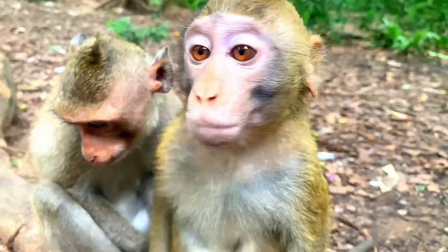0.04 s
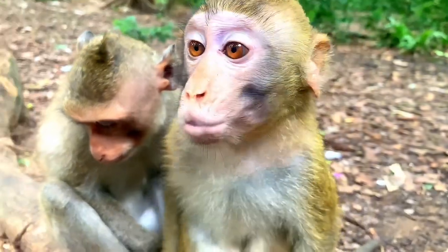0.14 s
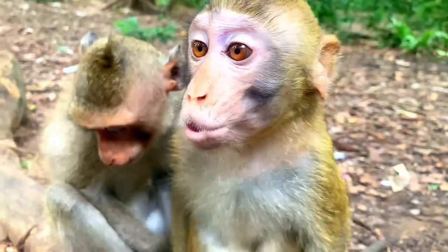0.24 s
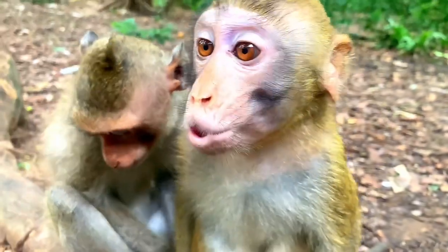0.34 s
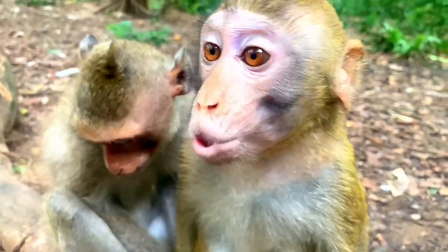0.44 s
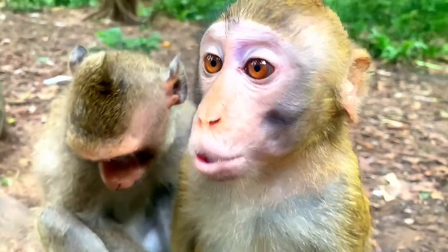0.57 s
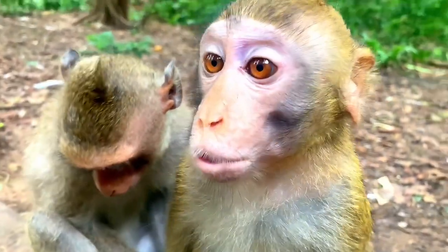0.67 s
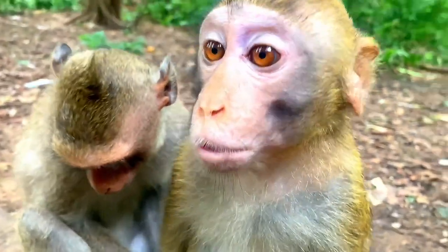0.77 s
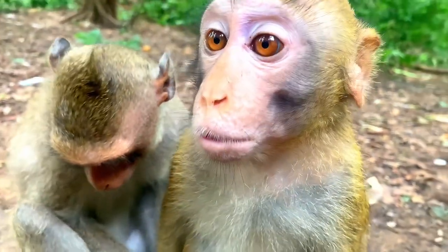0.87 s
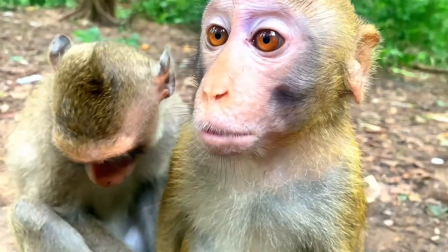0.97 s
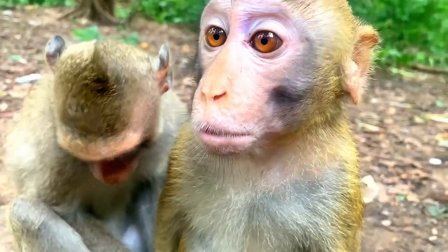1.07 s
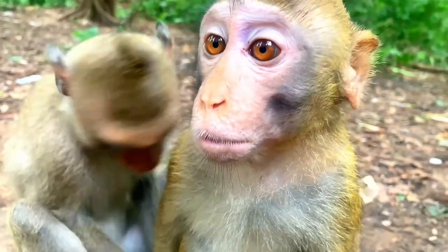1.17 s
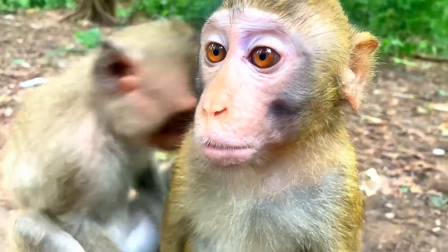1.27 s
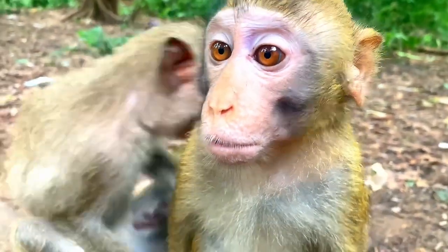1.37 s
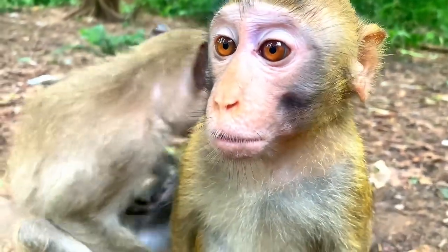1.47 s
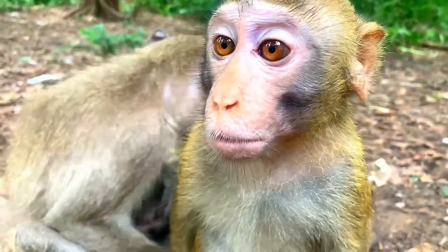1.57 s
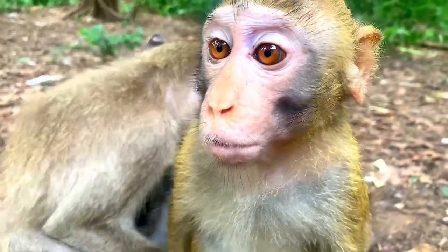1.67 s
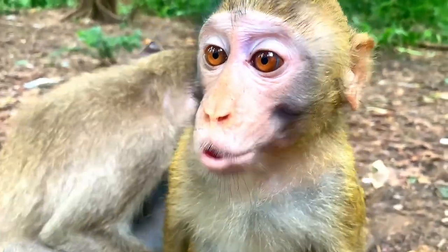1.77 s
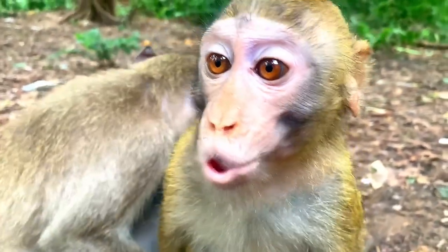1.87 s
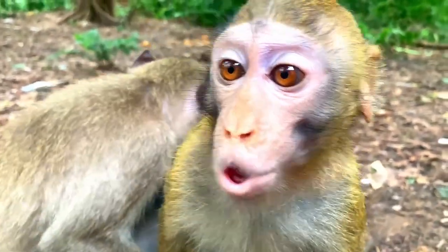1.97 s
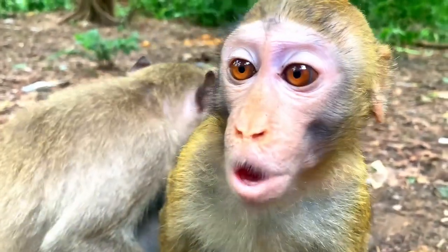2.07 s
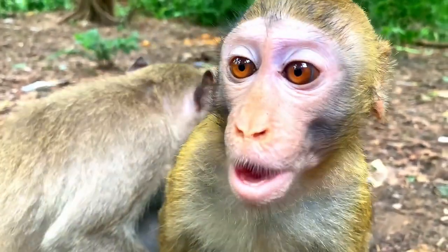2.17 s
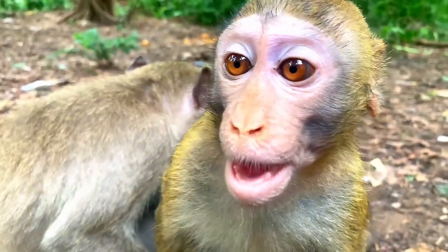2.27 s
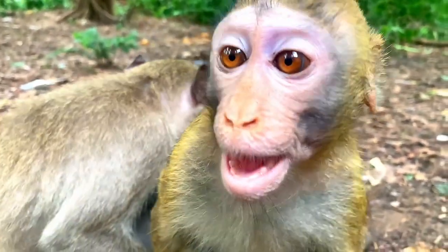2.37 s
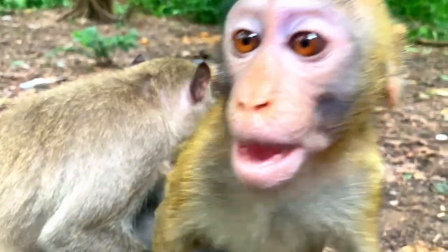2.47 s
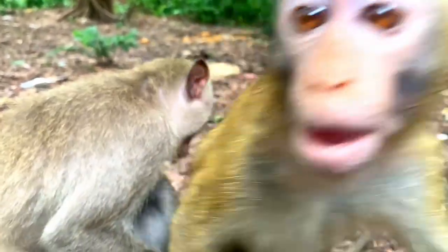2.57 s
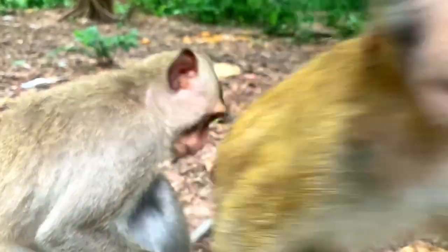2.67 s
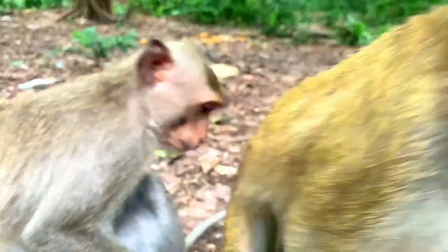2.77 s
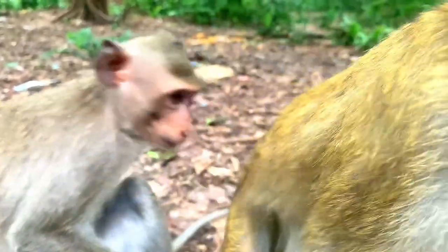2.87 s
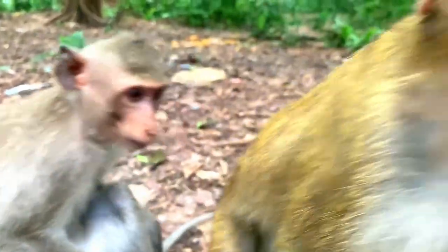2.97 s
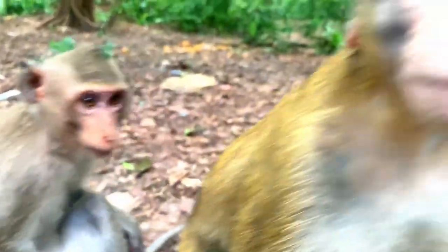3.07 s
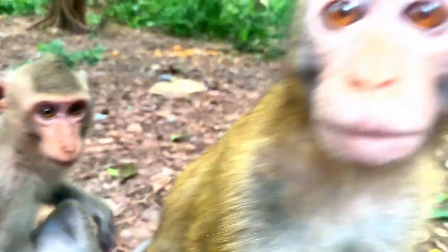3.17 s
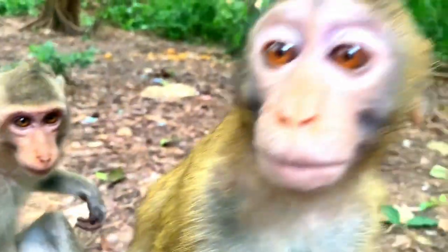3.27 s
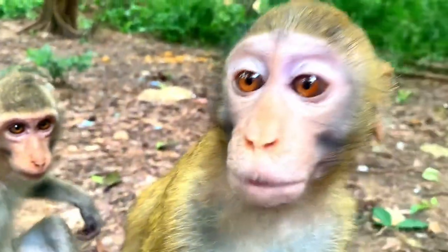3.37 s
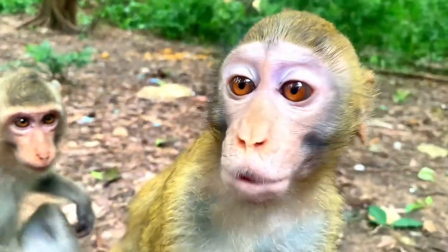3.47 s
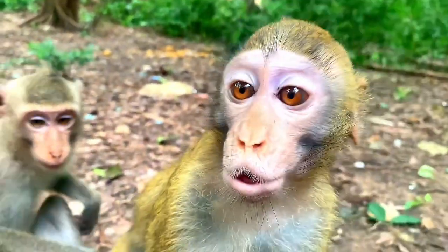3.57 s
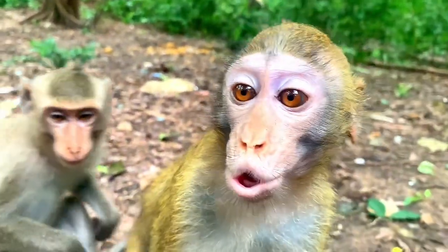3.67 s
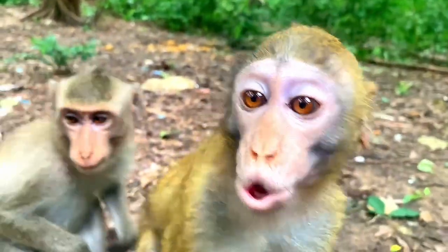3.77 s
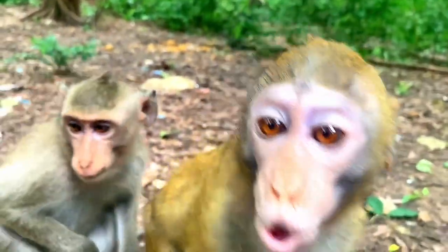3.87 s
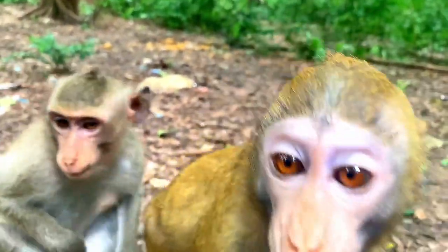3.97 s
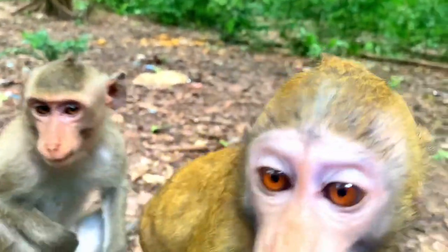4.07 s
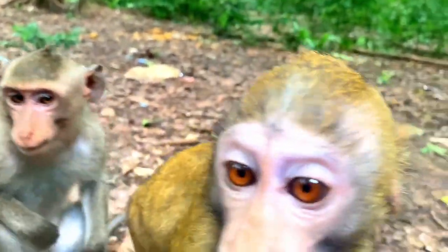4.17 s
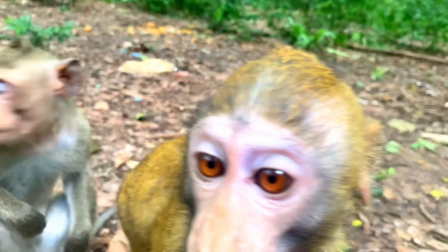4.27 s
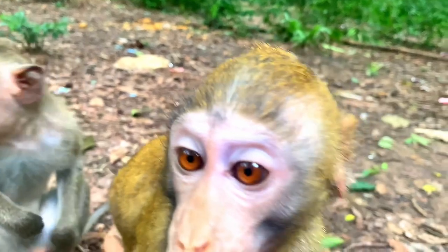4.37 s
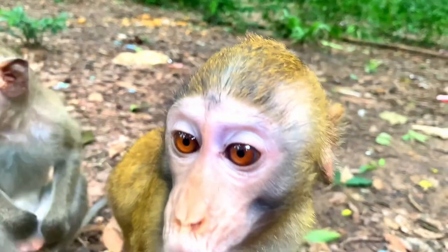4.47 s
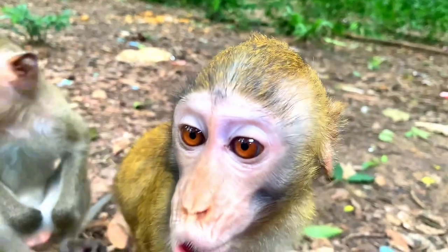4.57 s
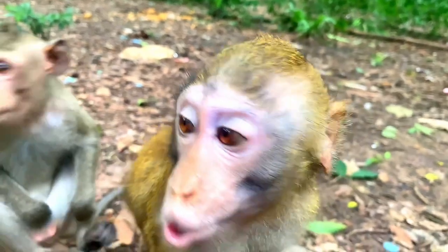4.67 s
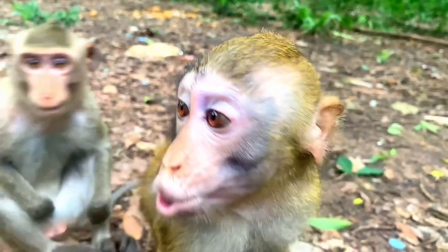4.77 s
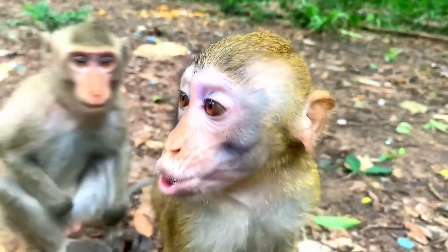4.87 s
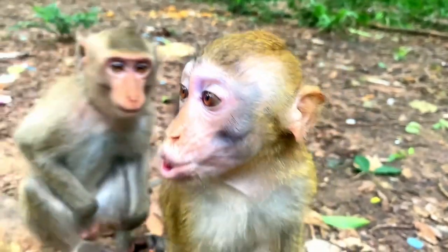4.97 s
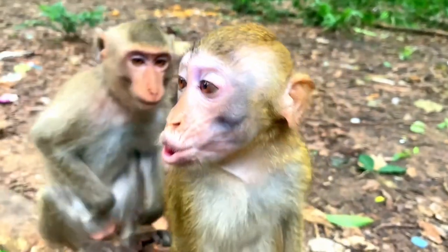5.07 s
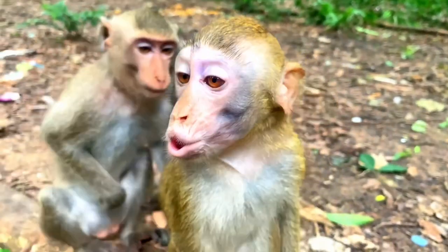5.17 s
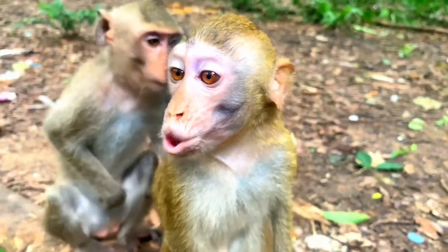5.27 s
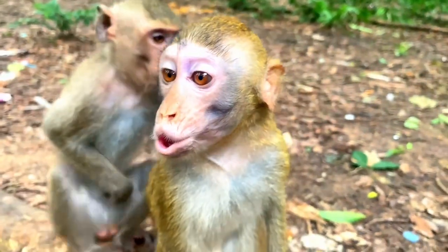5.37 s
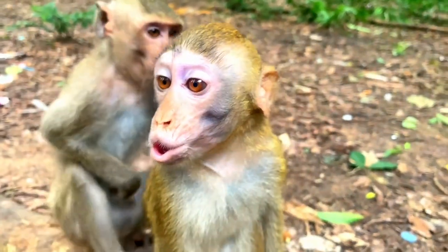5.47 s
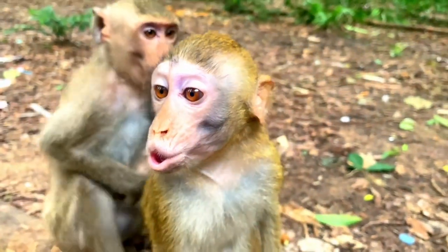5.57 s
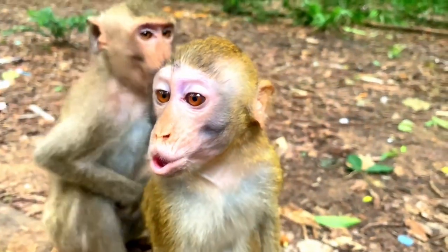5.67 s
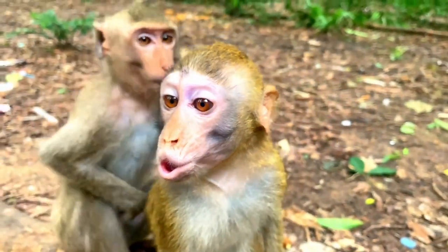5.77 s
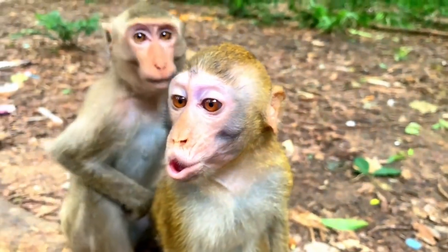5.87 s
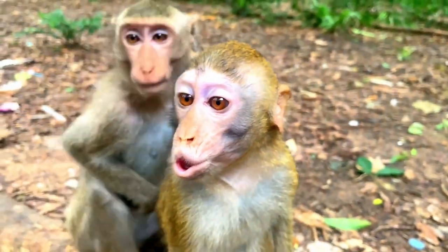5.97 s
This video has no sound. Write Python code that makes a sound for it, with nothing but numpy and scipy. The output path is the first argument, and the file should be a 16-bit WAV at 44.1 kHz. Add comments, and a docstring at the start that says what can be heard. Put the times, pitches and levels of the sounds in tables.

```python
"""Young macaque calling in a leafy clearing

Close to a phone it gives four clear coos, a faint one, and a squeal that sweeps up into a scream: harmonics
weighted by mouth and throat resonances, with noise for breath and rasp. Monkeys shuffle on dry litter and
bump the phone (filtered impulses, bursts of noise), over a faint low outdoor hum (coloured noise).
For stretches everything under 8 kHz sinks, leaving only the thin top of the voice."""
import sys
import numpy as np
from scipy import signal
from scipy.fft import rfft, irfft, next_fast_len
from scipy.io import wavfile
from scipy.ndimage import uniform_filter1d, map_coordinates

SR = 44100
rng = np.random.default_rng(int(sys.argv[2]) if len(sys.argv) > 2 else 0)


def put_to_file(sound):
    """Save the sound as 16-bit audio at rate SR, in the file named by the first command-line argument."""
    columns = np.atleast_2d(sound).T  # one column per channel
    safe = np.clip(columns, -1, 1)
    whole_steps = np.round(safe * 32767)
    wavfile.write(sys.argv[1], SR, whole_steps.astype(np.int16))


N = 265813
TIME_S = np.arange(N) / SR
FFT_SIZE = next_fast_len(N + SR // 4)
FREQ_HZ = np.arange(FFT_SIZE // 2 + 1) * SR / FFT_SIZE
LOG_FREQ = np.log(FREQ_HZ + 1)

# Outdoor hum spectrum. Each row: frequency in Hz, density in dB per Hz.
HUM_SPECTRUM = [(20, -26), (50, 0), (100, -4), (140, -8), (200, -20), (320, -29), (450, -28), (650, -23),
                (900, -29), (1300, -42), (1750, -35), (2300, -58), (8200, -61), (11000, -72)]
# Microphone hiss spectrum. Each row: frequency in Hz, density in dB per Hz.
HISS_SPECTRUM = [(30, 0), (150, 3), (300, -1), (650, -3), (1200, -10), (2400, -16), (4300, -15),
                 (5500, -19), (7000, -21), (12500, -22), (14500, -34)]
HUM_DB, HISS_DB = -53.5, -78
# Faint far chirps. Each row: centre in seconds, length in seconds, pitch in Hz, level in dB.
CHIRPS = [(2.225, .06, 1625, -69), (2.86, .07, 1735, -69)]
# Shuffles on the litter and bumps on the phone. Each row: start in seconds, thud in dB, scuff in dB.
BUMPS = [(.005, -37, -66), (.044, -50, -56), (1.226, -62, -43), (1.849, -64, -52), (3.015, -52, -47),
         (3.156, -29, -54), (3.26, -37, -72), (3.394, -29, -50), (3.745, -30, -60), (3.915, -32, -58),
         (4.825, -39, -60), (5.246, -62, -49)]
# Spectrum of a dull push. Each row: frequency in Hz, gain in dB.
THUD_SPECTRUM = [(20, -8), (50, 3), (90, 1), (160, -9), (300, -24), (600, -34), (1200, -60), (4000, -100)]
# Spectrum of scuffed leaves. Each row: frequency in Hz, gain in dB.
SCUFF_SPECTRUM = [(200, -22), (400, -12), (540, 0), (750, -6), (1100, -13), (1500, -24), (2100, -30),
                  (3000, -48), (8000, -68)]
# One hollow knock. Single row: centre in seconds, length in seconds, pitch in Hz, level in dB.
KNOCK = (3.396, .007, 545, -39)

# Upper throat resonances. Each row: frequency in Hz, gain in dB.
THROAT = [(4300, -24), (5200, -20), (5900, -6), (6500, 1), (6950, -2), (7450, -20), (8050, -4), (8500, 0),
          (8900, 0), (9400, -6), (9750, -11), (10400, -18), (12000, -28), (14000, -44)]
# Air rushing through the strained throat. Each row: frequency in Hz, gain in dB.
RASP = [(1000, -30), (1650, -3), (2200, -14), (3100, -4), (3700, -5), (4600, 0), (5600, -13), (7000, -25),
        (8700, -17), (11000, -34)]
# Puffs of air at the start or end of a call. Each row: centre in seconds, length in seconds, level in dB,
# share of the low resonances in dB.
PUFFS = [(.048, .007, -66, -6), (2.435, .025, -66, -1), (3.609, .006, -77, -20), (4.245, .05, -87, -26),
         (4.398, .005, -72, -6), (5.135, .06, -93, -18)]

# Coo contours; the second is the faint one. Each row: time in seconds, pitch in Hz, effort in dB.
COO_1 = [(0.045, 997, -34), (0.075, 940, -29), (0.192, 934, -26), (0.285, 1011, -35), (0.305, 1068, -32),
         (0.36, 1085, -30), (0.468, 1097, -31), (0.528, 1182, -25)]
COO_2 = [(3.402, 1077, -63), (3.414, 1097, -55), (3.46, 1149, -45), (3.52, 1095, -46), (3.6, 1134, -46)]
COO_3 = [(3.609, 1055, -27), (3.636, 1129, -32), (3.712, 1116, -24), (3.749, 1074, -21), (3.89, 1072, -17),
         (3.955, 1090, -18), (4.076, 1056, -15), (4.125, 1014, -15), (4.16, 968, -21), (4.176, 952, -37)]
COO_4 = [(4.397, 956, -37), (4.474, 1022, -20), (4.62, 1070, -22), (4.77, 1083, -21), (4.81, 1091, -23),
         (4.95, 1062, -23), (5.032, 1017, -25), (5.064, 955, -29), (5.082, 938, -32)]
COO_5 = [(5.247, 963, -26), (5.34, 981, -27), (5.41, 1003, -27), (5.44, 1002, -27), (5.582, 1068, -20),
         (5.73, 1087, -22), (5.776, 1124, -26), (5.86, 1143, -28), (5.97, 1157, -29), (6.02, 1106, -28)]
# Voicing, one row per coo. Each row: first mouth resonance in Hz, second in Hz, second harmonic re effort
# in dB, level of the third in dB, throat ring in dB, ring rise in seconds, pitch jitter as a share.
VOICING = [(1044, 2167, -27, -66, -75, .03, .003), (1115, 2049, -16, -66, -105, .02, .008),
           (1159, 1983, -14.5, -48, -71.5, .02, .0014), (1103, 1959, -14.5, -61, -72.5, .07, .0014),
           (1151, 2010, -17, -61, -75, .48, .0018)]
# Widths of the first, second and third mouth resonance, in Hz.
MOUTH_WIDTHS_HZ = (72, 258, 560)
THIRD_RESONANCE_HZ = 2950
OVERTONE_RELEASE_S = .035  # upper harmonics die before the call ends

# Squeal contour. Each row: time in seconds, pitch in Hz.
SQUEAL = [(1.845, 1634), (1.877, 1802), (1.921, 2281), (2.011, 3129), (2.019, 3474), (2.033, 4525),
          (2.047, 5486), (2.067, 6125), (2.089, 7304), (2.111, 8095), (2.133, 8779), (2.181, 9276),
          (2.251, 9056), (2.353, 8591), (2.391, 8040), (2.41, 6776)]
# Moments of strain. Each row: centre in seconds, length in seconds, added roughness 0-1, flutter depth 0-1,
# rasp in dB, change of effort in dB.
STRAIN = [(2.049, .033, .65, .3, -67, -9), (2.29, .09, .09, .19, -64, -1)]
# Response of the wide-open mouth to a partial. Each row: frequency in Hz, gain in dB.
OPEN_MOUTH = [(1650, -27), (1840, -31), (2020, -14), (2400, -28), (2800, -14), (3100, -14.5), (3400, -28),
              (4300, -53), (5400, -48), (6200, -42), (7500, -60), (8200, -37), (9300, -37), (10700, -47),
              (15000, -50)]
# Fixed gaps in frequency that the squeal passes through, each applied twice. Each row: centre in Hz, width in
# Hz, depth of one pass 0-1.
SQUEAL_GAPS = [(2170, 110, .45), (2370, 170, .6), (2880, 70, .55), (8230, 50, .4), (8730, 170, .95),
               (9100, 170, .95)]
SQUEAL_START_DB, SQUEAL_RISE_S, SQUEAL_SAG_DB_PER_S, SQUEAL_RELEASE_S = -25, .115, 10, .02

# Phase by which the left port leads the right. Each row: frequency in Hz, phase in radians.
PORT_PHASE = [(300, 0), (1100, -.85), (1900, -.6), (2500, -1.3), (3100, -2.7), (3700, -3.1), (4200, 0),
              (5300, 3.1), (6500, 6.1), (9000, 8.8)]
# Stretches in which lows and mids sink. Each row: start in seconds, end in seconds.
DIPS = [(.062, .757), (3.425, 3.707), (4.18, 4.796), (5.424, 5.586)]
# Depth of that sinking. Each row: frequency in Hz, gain in dB.
DIP_DEPTH = [(60, -27), (1100, -28), (2200, -21), (3200, -26), (4500, -18), (6500, -11), (7900, -10),
             (8050, 0)]
# Bright peak of the right microphone. Each row: frequency in Hz, gain in dB.
RIGHT_PEAK = [(7850, 0), (8020, 20), (9200, 20), (9700, 14), (10400, 8), (12500, 0)]
TOP_HZ = 15100


def undb(db):
    """Decibels to gain."""
    return np.exp(np.asarray(db) * (np.log(10) / 20))


def unit(x):
    """Scale to rms 1."""
    return x / np.sqrt(np.mean(x ** 2))


def curves(table, t):
    """Each column of a table after the first, interpolated linearly at the times t."""
    s, *columns = np.transpose(table)
    return [np.interp(t, s, column) for column in columns]


def at(points, hz=None):
    """Read a spectrum on a log-frequency axis, by default at every FFT bin."""
    f, value = np.transpose(points)
    log_hz = LOG_FREQ if hz is None else np.log(hz)
    return np.interp(log_hz, np.log(f), value)


def filtered(x, response):
    """Apply a frequency response."""
    return irfft(rfft(x, FFT_SIZE) * response, FFT_SIZE)[..., :N]


def noise(points, size=N):
    """Gaussian noise of a given colour, rms 1."""
    n = next_fast_len(size, True)
    hz = np.arange(n // 2 + 1) * SR / n + 1
    spectrum = rfft(rng.standard_normal(N), n) * undb(at(points, hz))
    return unit(irfft(spectrum, n)[:size])


def waver(rate_hz, t):
    """Smooth random motion at a given rate, spread near 1."""
    steps = 2 * rate_hz * (t - t[0])
    return map_coordinates(rng.standard_normal(8192), [steps], order=2, mode="wrap")


def during(start_s, end_s, t, edge_s=.004):
    """1 between two times, with soft edges."""
    return (1 + np.tanh(2 * np.minimum(t - start_s, end_s - t) / edge_s)) / 2


def swell(centre_s, length_s, t):
    """Gaussian rise and fall around one moment."""
    return np.exp(-2 * ((t - centre_s) / length_s) ** 2)


def around(start_s, end_s):
    """Sample times of an event, with a 10 ms margin."""
    return TIME_S[(TIME_S > start_s - .01) & (TIME_S < end_s + .01)]


def placed(x, t):
    """Put a short sound at its times."""
    out = np.zeros(N)
    out[np.round(t * SR).astype(int)] = x
    return out


def resonance(hz, centre_hz, width_hz):
    """Gain of a steep resonance: 1 at its centre, 1/2 at half a width away."""
    return 1 / (1 + (2 * (hz - centre_hz) / width_hz) ** 2)


def hum():
    """Low coloured noise whose level wavers slightly."""
    return noise(HUM_SPECTRUM) * undb(HUM_DB + 1.2 * waver(8, TIME_S))


def hiss():
    """Microphone noise, shared in the bass and separate in the treble."""
    side = filtered(noise(HISS_SPECTRUM), np.clip(FREQ_HZ / 2500, 0, 1) ** 2)
    return undb(HISS_DB) * (noise(HISS_SPECTRUM) + np.array([side, -side]))


def clearing(x, t60_s=.6, wet_db=-45):
    """Trunks and leaves scatter a faint decaying tail, different at each port."""
    t = TIME_S[:SR // 2]
    tail = rng.standard_normal((2, len(t))) * undb(-60 * t / t60_s) * (t > .008)
    tail /= np.sqrt(np.sum(tail ** 2, axis=1, keepdims=True))
    colour = undb(at([(1000, -8), (3000, -6), (8500, 14)]))  # Hz, dB
    return undb(wet_db) * filtered(x, rfft(tail, FFT_SIZE) * colour)


def chirps():
    """Far-off notes: single sines of unsteady pitch that swell and fade."""
    out = 0
    for centre_s, length_s, hz, db in CHIRPS:
        t = around(centre_s - 2 * length_s, centre_s + 2 * length_s)
        phase = 2 * np.pi * np.cumsum(hz * (1 + .012 * waver(60, t))) / SR
        out = out + placed(swell(centre_s, length_s, t) * undb(db) * np.sin(phase), t)
    return out


def bumps(scuff_decay_s=.008):
    """Each contact is one dull push (a filtered impulse) and a decaying scuff of leaves (noise)."""
    pushes, scuffs = np.zeros(N), np.zeros(N)
    decay = np.exp(-TIME_S[:SR // 4] / scuff_decay_s)
    for start_s, thud_db, scuff_db in BUMPS:
        start = max(int(start_s * SR), 0)
        pushes[start] += undb(thud_db)
        scuffs[start:start + SR // 4] += undb(scuff_db) * decay
    thud = undb(at(THUD_SPECTRUM))
    scuff = noise(SCUFF_SPECTRUM) * uniform_filter1d(scuffs, size=90)  # softens the onsets
    return filtered(pushes, thud / thud.mean()) + scuff


def knock():
    """A few cycles of a heavily damped resonance."""
    centre_s, length_s, hz, db = KNOCK
    t = around(centre_s - 2 * length_s, centre_s + 2 * length_s)
    tone = np.sin(2 * np.pi * hz * (t - centre_s))
    return placed(undb(db) * swell(centre_s, length_s, t) * tone, t)


def puffs():
    """Unvoiced air through the same throat as a call starts or ends."""
    out = 0
    for centre_s, length_s, db, low_db in PUFFS:
        t = around(centre_s - 2 * length_s, centre_s + 2 * length_s)
        low = min(undb(low_db), 1)
        air = low * noise(RASP, size=len(t)) + (1 - low) * noise(THROAT, size=len(t))
        out = out + placed(swell(centre_s, length_s, t) * undb(db) * air, t)
    return out


def strain(t, calm_rough=.03):
    """Roughness, flutter, rasp gain and effort change (dB), swelling around each moment of strain."""
    total = 0
    for centre_s, length_s, rough, flutter, rasp_db, change_db in STRAIN:
        peaks = [rough, flutter, undb(rasp_db), change_db]
        total = total + np.outer(peaks, swell(centre_s, length_s, t))
    rough, flutter, rasp, change_db = total
    return calm_rough + rough, flutter, rasp, change_db


def squeal(flutter_hz=450, jitter=.012, second_db=-8, third_db=-27, fourth_db=-34, brighten=1.2):
    """Four harmonics sweep up through the mouth's peaks and through fixed gaps, roughening and fluttering under
    strain."""
    start_s, end_s = SQUEAL[0][0], SQUEAL[-1][0]
    t = around(start_s, end_s)
    hz, = curves(SQUEAL, t)
    rough, flutter, rasp, change_db = strain(t)
    swell_db = SQUEAL_START_DB * np.clip(1 - (t - start_s) / SQUEAL_RISE_S, 0, 1)
    effort_db = swell_db - SQUEAL_SAG_DB_PER_S * (t - start_s) + change_db
    gate = during(start_s, end_s, t) * np.clip((end_s - t) / SQUEAL_RELEASE_S, 0, 1)
    phase = 2 * np.pi * np.cumsum(hz * (1 + jitter * (rough + .1) * waver(500, t))) / SR
    voice = 0
    for k, db in enumerate([0, second_db, third_db, fourth_db], 1):
        # overtones reach full strength only once the effort has risen
        partial_db = db + at(OPEN_MOUTH, k * hz) + brighten * swell_db * (k > 1)
        voice = voice + np.sqrt(2) * undb(partial_db) * np.sin(k * phase) * (k * hz < TOP_HZ)
    beat = np.sin(2 * np.pi * np.cumsum(flutter_hz * (1 + .08 * waver(80, t))) / SR)
    voice = voice * undb(effort_db) * (1 + flutter * beat + rough * waver(600, t))
    gaps = 1
    for centre_hz, width_hz, depth in SQUEAL_GAPS:
        gaps = gaps * (1 - min(depth, 1) / (1 + 2j * (FREQ_HZ - centre_hz) / width_hz))
    air = placed(gate * rasp * noise(RASP, size=len(t)), t)
    return filtered(placed(gate * voice, t), gaps ** 2) + air


def coo(curve, voicing, shimmer=.016, fourth_db=-28, fifth_db=-33, breath_db=-26, flicker_db=2.5):
    """A nearly pure voice: low harmonics follow the mouth resonances, high ones ring in the throat."""
    first_hz, second_hz, second_db, third_db, ring_db, ring_rise_s, jitter = voicing
    first_width_hz, second_width_hz, third_width_hz = MOUTH_WIDTHS_HZ
    start_s, end_s = curve[0][0], curve[-1][0]
    t = around(start_s, end_s)
    hz, effort_db = curves(curve, t)
    phase = 2 * np.pi * np.cumsum(hz * (1 + jitter * waver(120, t))) / SR
    release = np.clip((end_s - t) / OVERTONE_RELEASE_S, 0, 1)
    # as pitch moves, each harmonic enters or leaves its resonance
    first = undb(effort_db) * resonance(hz, first_hz, first_width_hz)
    second = undb(effort_db + second_db) * resonance(2 * hz, second_hz, second_width_hz)
    third = undb(third_db + flicker_db * waver(12, t) / 2) * np.sqrt(release)
    third = third * resonance(3 * hz, THIRD_RESONANCE_HZ, third_width_hz)
    gains = [first, second, third, third * undb(fourth_db), third * undb(fifth_db)]
    voice = sum(gain * np.sin(k * phase) for k, gain in enumerate(gains, 1))
    # the throat ring swells in, dies early, and each harmonic flickers on its own
    ring_gain = undb(ring_db) * (np.clip((t - start_s) / ring_rise_s, 0, 1) * release) ** 2
    ring = 0
    for k in range(4, 13):
        harmonic_db = at(THROAT, k * hz) + flicker_db * waver(10, t)
        ring = ring + undb(harmonic_db) * np.cos(k * phase)
    tone = np.sqrt(2) * (voice + ring_gain * ring) * (1 + shimmer * waver(220, t))
    breath = ring_gain * undb(breath_db) * noise(THROAT, size=len(t))
    return placed(during(start_s, end_s, t) * (tone + breath), t)


def scene():
    """Near sounds reach the two ports with different phase; hum and chirps are the same in both."""
    contours = (COO_1, COO_2, COO_3, COO_4, COO_5)
    coos = sum(coo(curve, voicing) for curve, voicing in zip(contours, VOICING))
    voice = coos + squeal() + puffs()
    near = voice + bumps() + knock()
    ports = np.array([filtered(near, np.exp(1j * at(PORT_PHASE))), near])
    return ports + clearing(voice) + hum() + chirps()


def record(dry, bass_lag_s=.038, bass_hz=170):
    """Lows and mids sink at times, bass arrives late, the right is brighter, hiss joins, the top is cut."""
    sunk = sum(during(start_s, end_s, TIME_S, edge_s=.005) for start_s, end_s in DIPS)
    x = (1 - sunk) * dry + sunk * filtered(dry, undb(at(DIP_DEPTH)))
    # lag grows toward the bass, so every thud glides downward
    lag = np.exp(-2j * np.pi * bass_lag_s * bass_hz * np.arctan(FREQ_HZ / bass_hz))
    x = filtered(x, np.array([lag, lag * undb(at(RIGHT_PEAK))]))
    top_cut = signal.ellip(8, .2, 70, TOP_HZ, fs=SR, output="sos")
    return signal.sosfilt(top_cut, x + hiss())


dry = scene()
out = record(dry)
put_to_file(out)
```